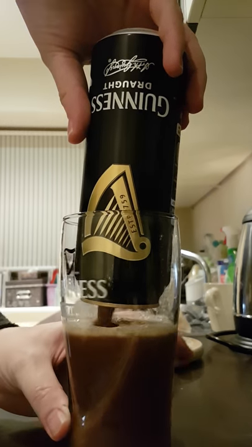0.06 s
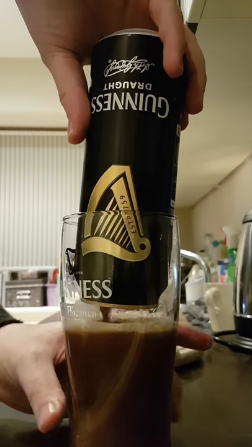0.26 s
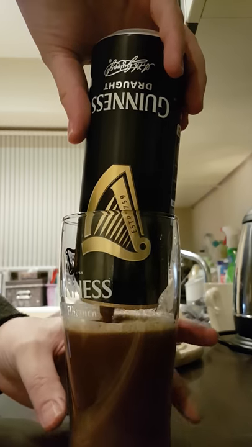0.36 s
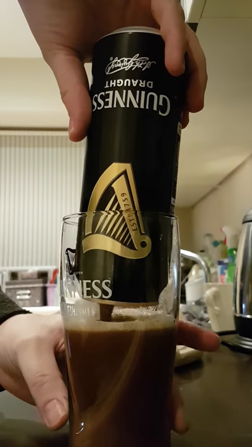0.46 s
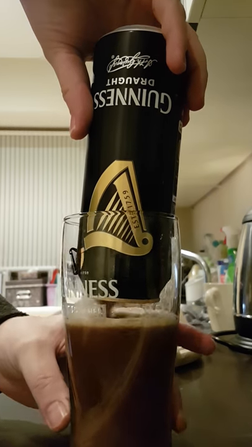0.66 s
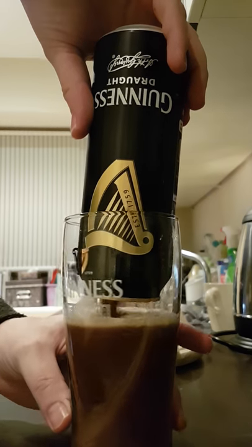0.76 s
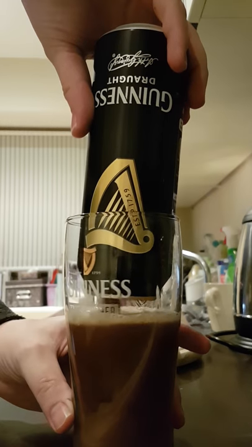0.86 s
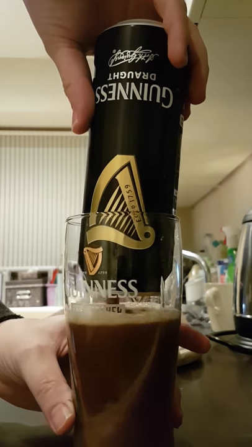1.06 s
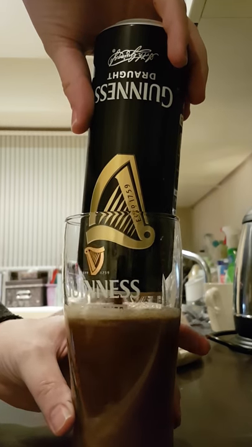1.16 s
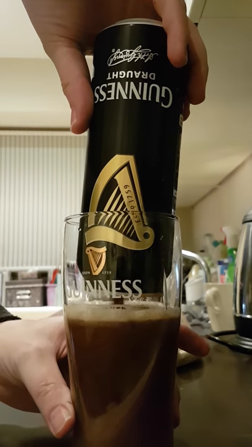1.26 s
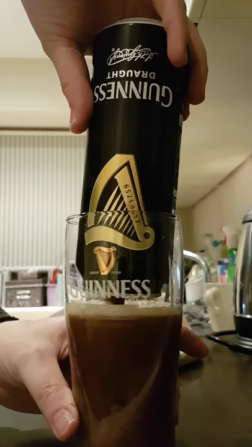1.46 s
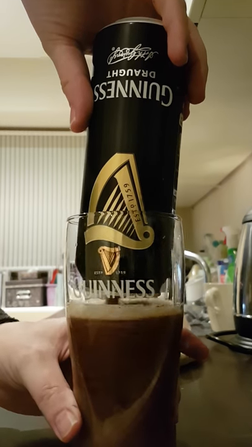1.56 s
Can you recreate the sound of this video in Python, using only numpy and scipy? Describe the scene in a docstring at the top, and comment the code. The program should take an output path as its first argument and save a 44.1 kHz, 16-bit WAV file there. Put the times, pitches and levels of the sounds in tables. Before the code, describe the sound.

Quick, hollow glugs of beer pour from a can into a glass, heard close in a quiet kitchen. Something bumps the counter early on, foam spits lightly throughout, and a faint glass note joins the last gulps.

```python
"""Beer glugs from an upturned can into a nearly full glass in a quiet kitchen.
From the start, each gulp of air thumps the can's cavity while foam spits and the can ticks.
At 0.2 s something judders briefly on the counter, a bump close to the right microphone.
From 1 s the glass sings one faint note under the last glugs. Fizz and room tone run throughout."""
import sys
import numpy as np
from scipy import signal
from scipy.fft import rfft, irfft
from scipy.io import wavfile

SR = 44100
rng = np.random.default_rng(int(sys.argv[2]) if len(sys.argv) > 2 else 0)


def waveform_to_disk(signal):
    """Save audio, clipped to [-1, 1], as 16-bit WAV at the path in sys.argv[1]."""
    frames = np.transpose(np.atleast_2d(signal))
    scaled = np.clip(frames, -1, 1) * 32767
    samples = np.round(scaled).astype(np.int16)
    wavfile.write(sys.argv[1], SR, samples)


N = 70560
GRAIN = SR // 4  # samples in one glug or tick

# The rhythm of the pour. Each row: start in seconds, relative level in dB, pitch ratio.
GULPS = [(0.000, -7.5, 0.9), (0.0272, -7, 1.3), (0.1001, -0.5, 0.94), (0.1655, -3.5, 0.98),
         (0.1738, 0, 0.93), (0.324, 4.5, 1), (0.4195, -7.5, 1.04), (0.430, -5.5, 0.96), (0.5101, 0, 1.02),
         (0.5813, 0, 1.01), (0.6525, -3.5, 1), (0.7234, -0.5, 0.97), (0.7588, -13, 1.25),
         (0.808, -1, 1.014), (0.883, 2, 1.05), (0.9815, -6.5, 1), (1.0516, 2, 1.013), (1.157, -7.5, 1.02),
         (1.243, -1, 1.006), (1.3291, -1, 1.075), (1.4248, -5, 1.07), (1.5118, -2.5, 1.06),
         (1.595, -1, 1.24)]
# The can's hollow voice. Each row: mode in Hz at pitch ratio 1, relative level in dB, t60 in seconds.
CAN_MODES = [(122.4, -12.5, 0.032), (463, -11, 0.025), (684, 0, 0.017)]
# The snap of a bubble pinching off. Each row: frequency in Hz, gain in dB.
SNAP_EQ = [(600, 14), (1300, -9), (2300, 3), (3200, -6), (5000, -11.5), (10000, -21.5), (15000, -25.5)]


def glugs(body_db=-24, snap_db=-24.5, muffle_hz=888, hollow_hz=252.5, hollow_width_hz=159):
    """Each gulp of air snaps off and rings the can's cavity, scooped in the low mids, muffled by beer."""
    body = np.zeros(N)
    for start, db, pitch in GULPS:
        add(body, start, undb(db) * modes(CAN_MODES, pitch, size=GRAIN))
    body = lowpass(body, muffle_hz, order=6)
    body = signal.lfilter(*signal.iirnotch(hollow_hz, hollow_hz / hollow_width_hz, fs=SR), body)
    starts, levels_db, _ = np.array(GULPS).T
    snaps = convolve(clicks(starts + 0.0007, undb(levels_db)), colour(SNAP_EQ))
    return undb(snap_db) * snaps - undb(body_db) * body


# Spits of foam and ticks of the can. Each row: start in seconds, level in dB, centre in Hz,
# filter width in Hz, t60 in seconds, low thump in dB, dull knock in dB.
SPITS_AND_TICKS = [(0.025, -46.5, 1240, 1050, 0.064, -69, -71.5),
                   (0.087, -53.5, 2370, 4000, 0.016, -59, -46),
                   (0.1649, -51, 2000, 4000, 0.017, -73, -41.5),
                   (0.394, -49, 1680, 2900, 0.047, -67, -40.5), (0.648, -53, 2900, 5000, 0.023, -81, -67),
                   (0.760, -53, 1760, 1500, 0.02, -83, -47.5), (0.777, -62, 2190, 2010, 0.092, -40, -46.5),
                   (0.795, -48.5, 2400, 1400, 0.033, -41, -44), (0.831, -59, 5100, 4000, 0.014, -63, -80),
                   (0.856, -50, 1380, 1100, .035, -89, -45), (0.897, -42.5, 2120, 1860, 0.027, -72, -38.5),
                   (1.001, -55, 2420, 1200, 0.031, -59, -55.5),
                   (1.073, -55.5, 2170, 1800, 0.076, -39, -43.5),
                   (1.1285, -42.5, 3460, 4950, 0.014, -38.5, -40.5),
                   (1.282, -52, 2750, 1200, 0.017, -55, -54), (1.347, -50.5, 2640, 3000, 0.012, -79, -48.5),
                   (1.568, -44.5, 970, 830, 0.043, -68, -41)]


def ticks():
    """Foam spits and the can ticks: short bursts, some weighted with a dull knock and a low thump."""
    out = np.zeros(N)
    for start, db, hz, width_hz, t60, thump_db, knock_db in SPITS_AND_TICKS:
        knock = undb(knock_db) * burst(hz=550, width_hz=470, t60=0.053)
        spit = undb(db) * burst(hz, width_hz, t60)
        thump = modes([(110.88, thump_db, 0.06)], size=GRAIN)
        add(out, start, spit + knock + thump)
    return out


# The judder's swell and release. Each row: time in seconds, relative force in dB.
JUDDER_FORCE = [(0.193, -30.5), (0.206, -13.5), (0.215, -5), (0.226, 0), (0.24, 0), (0.257, 0.5),
                (0.267, -7.5), (0.28, -40.5)]
# The counter's dull thud. Each row: frequency in Hz, gain in dB.
COUNTER_EQ = [(40, -39), (70, -16), (100, 9.5), (150, 11.5), (205, -15), (340, 7), (620, 9.5), (900, 0),
              (1450, -11), (2200, -18.5), (4000, -31), (7000, -46.5), (11000, -49)]
# The ring after the bump: the kitchen's low boom and the counter's shorter resonances, played 1% flat.
# Each row: mode in Hz, relative level in dB, t60 in seconds.
BUMP_RING = [(119.7, -59, 0.72), (145.7, -50.5, .45), (280.5, -53.5, 0.48), (350, -45, 0.13),
             (423.2, -45.5, 0.23), (569.3, -42.5, 0.18), (653.4, -45.5, 0.32), (969, -47, 0.044),
             (1380, -45.5, .05)]
# The bump as the far, left microphone hears it. Each row: frequency in Hz, gain in dB.
FAR_SIDE_EQ = [(100, -21.5), (200, -11.5), (350, 0.5), (600, -10.5), (1200, -24.5), (2500, -26.5),
               (6000, -8)]


def judder(room, first_slip_s=0.1962, slips_per_s=114.16, drive_db=12, grit_db=-27):
    """Stick-slip: ten quick slips with grit between them shake the counter."""
    times, force_db = np.array(JUDDER_FORCE).T
    force = np.interp(clock(), times, undb(force_db), left=0, right=0)
    jitter = 0.028 * rng.standard_normal(10)
    slip_times = first_slip_s + (np.arange(10) + jitter) / slips_per_s
    pushes = lowpass(clicks(slip_times, np.ones(10)), hz=2160, order=2)
    grit = undb(grit_db) * rng.standard_normal(N)
    drive = undb(drive_db) * force * (pushes + grit)
    body = convolve(drive, colour(COUNTER_EQ) + modes(BUMP_RING, pitch=0.99))
    early, tail = room
    reverb = convolve(body, undb(-6.5) * early + undb(-12.5) * tail)
    return np.vstack([convolve(body, colour(FAR_SIDE_EQ)), body]) + reverb


def glass(start_s=1.005, hz=1023, level_db=-55, rise_s=0.029, t60=2.16):
    """The glass, lightly brushed, sings one long note a little to the right."""
    t = clock() - start_s
    envelope = np.clip(t / rise_s, 0, 1) * fade(t, t60)
    pan = undb([[-4], [0]])
    return undb(level_db) * np.sin(2 * np.pi * hz * t) * envelope * pan


# The tone of the foam's crackle. Each row: frequency in Hz, gain in dB.
FIZZ_EQ = [(400, 2), (1200, -8.5), (2600, -10), (4500, -24.5), (9000, -24.5), (15000, -19)]


def fizz(pops_per_s=130, level_db=-72, spread_db=0.5):
    """Tiny bubbles burst at random in the head, all much the same size."""
    when, size_draw = rng.random((int(pops_per_s * N / SR), 2)).T
    sizes = undb(-spread_db * np.log(np.maximum(size_draw, 0.03)))
    pops = clicks(when * N / SR, sizes)
    return undb(level_db) * unit(convolve(pops, colour(FIZZ_EQ)))


# The tone of the noise bed. Each row: frequency in Hz, gain in dB.
BED_EQ = [(25, -14.5), (70, -1), (115, 4.5), (200, -7.5), (400, -7), (680, -4.5), (1200, -13.5),
          (2600, -17.5), (5000, -23.5), (9500, -29.5), (13000, -21), (16000, -23)]


def noise_bed(level_db=-60):
    """Soft running beer, room tone and hiss as one steady noise; the bass is alike on both sides."""
    shared_bass = lowpass(rng.standard_normal(N), hz=720, order=1)
    noise = rng.standard_normal((2, N)) + 1.6 * shared_bass
    return undb(level_db) * unit(convolve(noise, colour(BED_EQ)))


# The kitchen's reverb tail. Each row: band centre in Hz, relative level in dB, t60 in seconds.
REVERB_BANDS = [(60, -16, .4), (265, -1, 0.45), (600, 4, 0.16), (1490, -1.5, 0.31), (4000, -15, 0.66),
                (15600, 4, 0.45)]


def kitchen(predelay_s=0.0024, early_db=-7.5, early_t60=0.086):
    """Stereo impulse responses: early echoes off counter and cupboards, and the longer tail."""
    t = clock() - predelay_s
    spectrum = rfft(rng.standard_normal((2, N)))
    centres_hz = [row[0] for row in REVERB_BANDS]
    tail = np.zeros((2, N))
    for (_, db, t60), weights in zip(REVERB_BANDS, np.eye(len(REVERB_BANDS))):
        band = irfft(spectrum * curve(centres_hz, weights), N)
        tail += undb(db) * band * fade(t, t60)
    scatter = rng.standard_normal((2, N)) + rng.standard_normal(N)  # partly common to both sides
    early = unit(scatter * fade(t, early_t60))
    return undb(early_db) * early / np.sqrt(N), tail / np.sqrt(SR / 50)


# Left microphone against right for sounds at the glass. Each row: frequency in Hz, gain in dB.
LEFT_EQ = [(60, -3.5), (600, 0.5), (800, -5), (1100, -14), (2400, -3), (8000, -5.5), (15000, 3.5)]


def at_glass(sound, room, tail_db, right_lag_s=0.00008, echo_s=0.0115, echo_db=-20):
    """A sound at the glass as both microphones hear it: direct, one clear echo, then the kitchen."""
    sound = np.ravel(sound)
    early, tail = room
    direct = np.array([sound, delay(sound, right_lag_s)])
    echo = undb(echo_db) * delay(sound, echo_s)
    left, right = direct + echo + convolve(sound, early + undb(tail_db) * tail)
    return np.vstack([convolve(left, colour(LEFT_EQ)), right])


def undb(db):
    return 10 ** (np.asarray(db) / 20)


def clock():
    return np.arange(N) / SR


def unit(x):
    return x / np.sqrt(np.mean(x ** 2))


def delay(x, seconds):
    return np.interp(clock() - seconds, clock(), x, left=0)


def lowpass(x, hz, order):
    return signal.sosfilt(signal.butter(order, hz, fs=SR, output="sos"), x)


def convolve(x, response):
    return signal.fftconvolve(np.atleast_2d(x), np.atleast_2d(response), axes=-1)[:, :N]


def curve(points_hz, values):
    """Values joined over log frequency, read at every spectral bin."""
    bins_hz = np.arange(N // 2 + 1) * SR / N
    return np.interp(np.log(bins_hz + 1), np.log(points_hz), values)


def colour(eq):
    """Minimum-phase impulse response of an EQ curve."""
    hz, db = np.array(eq, float).T
    cepstrum = irfft(np.log(undb(curve(hz, db))), N)
    cepstrum[1:N // 2] *= 2
    cepstrum[N // 2 + 1:] = 0
    return irfft(np.exp(rfft(cepstrum)), N)


def fade(t, t60):
    """Silent before t = 0, then falling 60 dB every t60 seconds."""
    return (t >= 0) * np.exp(-np.log(1000) * np.maximum(t, 0) / t60)


def modes(table, pitch=1, size=N):
    """Damped sines struck together."""
    t = np.arange(size) / SR
    return sum(undb(db) * np.sin(2 * np.pi * hz * pitch * t) * fade(t, t60) for hz, db, t60 in table)


def burst(hz, width_hz, t60):
    """A dying puff of noise, filtered twice by one broad resonance."""
    b, a = signal.iirpeak(hz, hz / width_hz, fs=SR)
    noise = signal.lfilter(b, a, signal.lfilter(b, a, rng.standard_normal(GRAIN)))
    return unit(noise) * fade(np.arange(GRAIN) / SR, t60)


def clicks(times, sizes):
    return np.bincount(np.clip(times * SR, 0, N - 1).astype(int), sizes, N)


def add(out, start_s, sound):
    i = int(start_s * SR)
    out[i:i + len(sound)] += sound[:N - i]


def scene():
    """The pour, the bump and the singing glass share one kitchen over the noise bed."""
    room = kitchen()
    bed = noise_bed()
    bump = judder(room)
    pour = at_glass(glugs(), room, tail_db=-11)
    crackle = at_glass(ticks() + fizz(), room, tail_db=-7)
    return pour + crackle + bump + glass() + bed


# The microphones' soft treble. Each row: frequency in Hz, gain in dB.
MIC_EQ = [(5000, -1.5), (7500, -1), (9800, -5), (12500, -3.5), (16000, -2)]


def record(dry, low_cut_hz=91, top_hz=15800):
    """The microphones sag in the high treble; the recorder thins the bass and cuts the top."""
    softened = convolve(dry, colour(MIC_EQ))
    thinned = signal.sosfilt(signal.butter(2, low_cut_hz, "high", fs=SR, output="sos"), softened)
    return signal.sosfilt(signal.ellip(10, 0.2, 70, top_hz, fs=SR, output="sos"), thinned)


dry = scene()
out = record(dry)
waveform_to_disk(out)
```